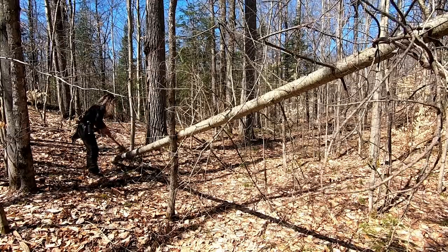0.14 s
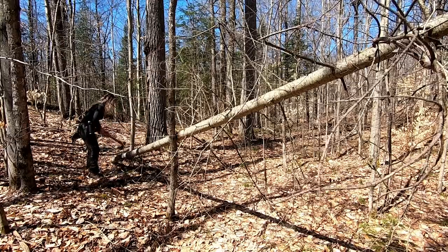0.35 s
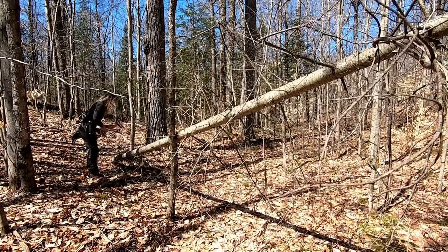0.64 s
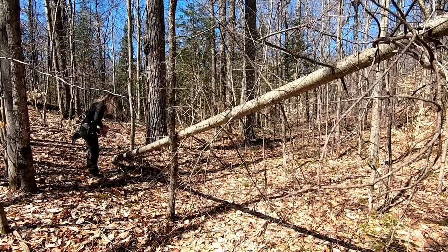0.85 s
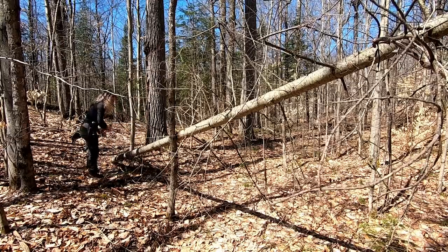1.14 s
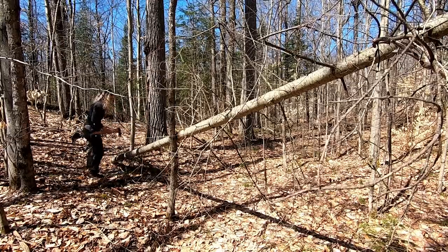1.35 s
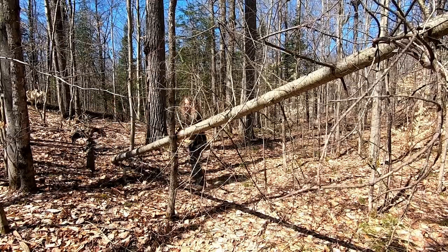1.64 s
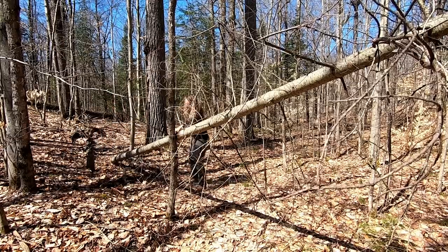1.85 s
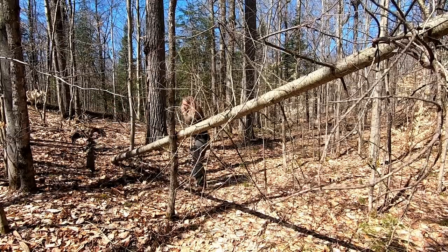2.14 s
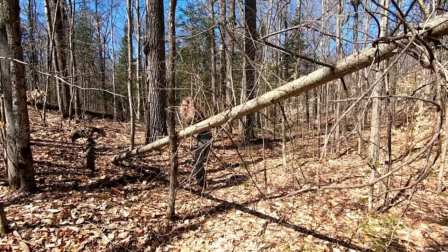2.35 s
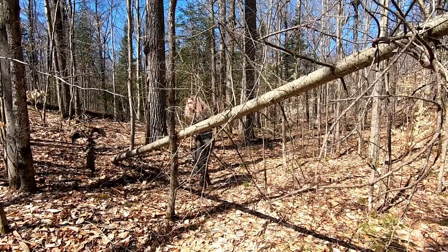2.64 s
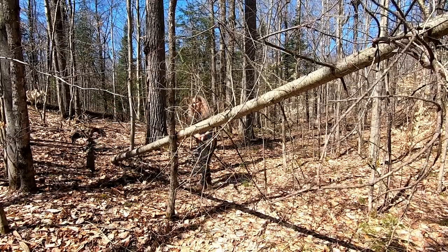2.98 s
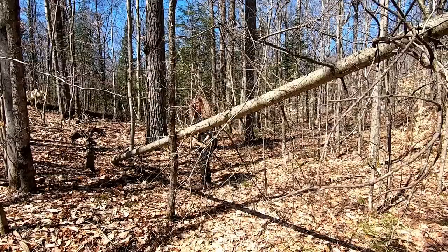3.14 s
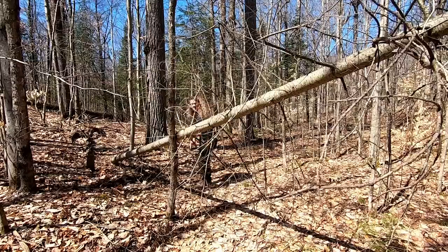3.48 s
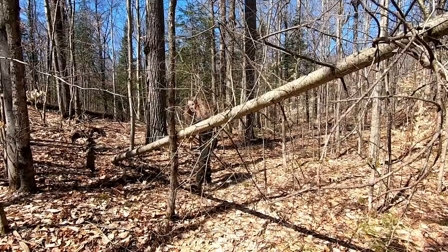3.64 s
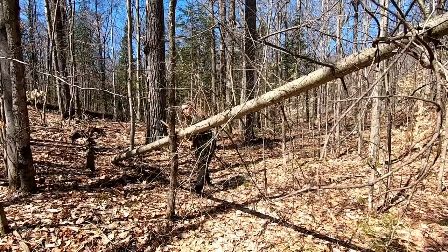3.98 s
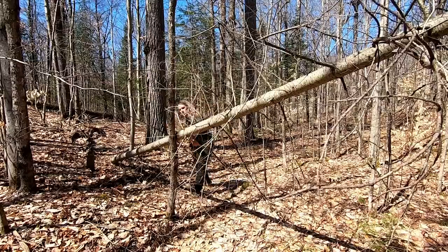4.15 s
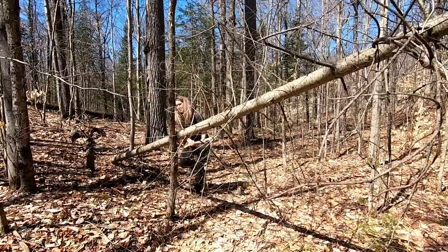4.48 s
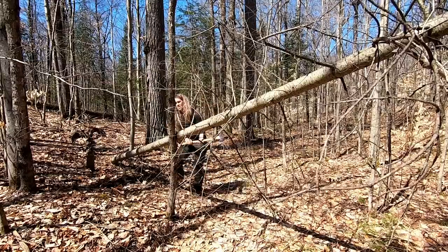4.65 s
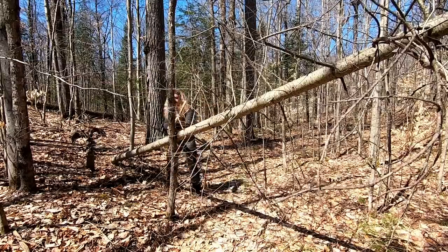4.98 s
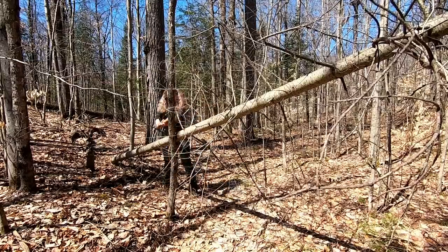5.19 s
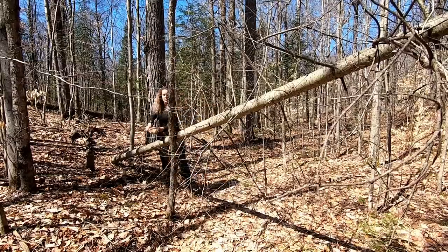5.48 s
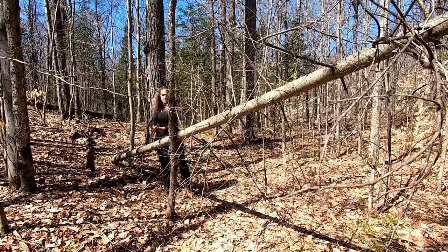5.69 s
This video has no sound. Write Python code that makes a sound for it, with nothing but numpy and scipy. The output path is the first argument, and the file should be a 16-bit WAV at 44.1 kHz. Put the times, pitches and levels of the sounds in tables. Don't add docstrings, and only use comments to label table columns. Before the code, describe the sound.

Dry dead wood is broken by hand outdoors: one hollow crack at the start, a near lull, then a piercing snap and several splintering breaks. Small twig ticks and shuffling leaf litter fill the gaps. Low wind flutter thumps the left channel of a small camera's microphone, easing later; short echoes scatter off the trunks.

```python
import sys
import numpy as np
from scipy import signal
from scipy.fft import rfft, irfft
from scipy.io import wavfile
from scipy.ndimage import uniform_filter1d

SR = 44100
rng = np.random.default_rng(int(sys.argv[2]) if len(sys.argv) > 2 else 0)


def unload_audio(sound):
    columns = np.transpose(np.atleast_2d(sound))
    steps = np.round(np.clip(columns, -1, 1) * 32767)
    wavfile.write(sys.argv[1], SR, steps.astype(np.int16))


def boost_factor(decibels):
    exponent = np.asarray(decibels, float) / 20
    return 10 ** exponent


N = 256662


def evened(x):
    return x / np.sqrt(np.mean(x ** 2) + 1e-20)


def smoothed(x, size):
    return uniform_filter1d(uniform_filter1d(x, size=size), size=size)


def read(points, hz):
    f, value = np.transpose(points)
    return np.interp(np.log(hz + 1), np.log(f + 1), value)


def sides(pan_db):
    return np.array([boost_factor(np.asarray(pan_db) / 2), boost_factor(-np.asarray(pan_db) / 2)])


def add(mix, s, sound):
    part = mix[:, max(round(s * SR), 0):][:, :sound.shape[1]]
    part += sound[:, :part.shape[1]]


def colour(x, gain):
    size = x.shape[-1]
    return irfft(rfft(x) * gain(np.fft.rfftfreq(size, 1 / SR)), size)


def resonate(x, hz, width):
    turn = np.exp(2j * np.pi * np.cumsum(hz * np.ones(x.shape[-1])) / SR)
    r = np.exp(-np.pi * width / SR)
    return 2 * (turn * signal.lfilter([1 - r], [1, -r], x / turn)).real


def ring(x, hz, width):
    return evened(resonate(resonate(x, hz, width), hz, width))


def wander(hz):
    return evened(colour(rng.standard_normal(N), lambda f: np.exp(-(f / hz) ** 2)))


def swells(rows, floor_db):
    nearer_s = 1.474
    t = np.arange(0, N + 64, 64) / SR
    levels = []
    for s, hold, peak_db, rise, fall in rows:
        before = (s - t) / max(rise, .002)
        after = (t - s - hold) / max(fall, .002)
        other_view = (t < nearer_s) != (s < nearer_s)
        levels.append(peak_db - 20 * np.maximum(0, np.maximum(before, after)) - 99 * other_view)
    return boost_factor(np.maximum(np.array(levels + [floor_db + 0 * t]), -200)) ** 2


def per_sample(slow):
    return np.interp(np.arange(N) / 64, np.arange(len(slow)), slow)


def blended(power, values):
    return per_sample(np.array(values) @ power / power.sum(axis=0))


# hz, lead_rad
PORT_LEAD = [(300, -3), (1380, 0.91), (5250, 0), (6600, 1.21), (8790, 1.5), (11000, 1.17), (15000, 0.8)]


def ports(x, bearing=0.97):
    return colour(x, lambda f: np.exp(.5j * bearing * np.outer([1, -1], read(PORT_LEAD, f))))


# hz, density_db_per_hz
SPLINTER_SPECTRUM = [(280, -35), (480, -6), (1420, -4), (2590, -2.5), (3090, -3.5), (3330, -3), (5480, -8),
                     (8900, -12), (14700, -37), (16000, -44.5)]
# hz, share_0_to_1
PORT_DIFFERENCE = [(500, 0.7), (3000, 0), (6500, 0.8), (15000, 1)]


def splinter(rows, ring_db, ring_q, lumps_db, tail_db, tail_longer, size=8192):
    out, t = np.zeros((2, N)), np.arange(size) / SR
    for s, peak_db, hz, t60, bright in rows:
        noise, lumps, bits, *own = rng.standard_normal((5, size))
        noise = noise + colour(np.array(own), lambda f: 1.27 * read(PORT_DIFFERENCE, f))

        def wood(f):
            return boost_factor(read(SPLINTER_SPECTRUM, f) + bright * np.log2(np.clip(f, 1100, 9500) / 3500))

        tear = evened(colour(noise, wood)) + boost_factor(ring_db) * ring(noise, hz, hz / ring_q)
        t60 = max(t60, .004)
        debris = evened(boost_factor(3.3 * evened(uniform_filter1d(bits, size=110))))
        fall = boost_factor(-60 * t / t60) + debris * boost_factor(tail_db - 60 * t / (tail_longer * t60))
        lumps_grow = 1 - np.exp(-t / 0.0023)
        fall *= boost_factor(lumps_db * lumps_grow * evened(uniform_filter1d(lumps, size=40)))
        onset = np.minimum(t / 0.00039, 1)
        burst = np.roll(tear * fall * onset, 64, axis=1)
        burst = ports(burst, rng.uniform(0.79, 1.5))
        add(out, s - .0013, boost_factor(peak_db - 13) * burst * sides([-1.5 + rng.normal(0, 0.89)]))
    return out


# start_s, peak_db, ring_hz, brightness_db_per_octave
LIMB_CRACKS = [(0.0833, -8, 3600, 3), (1.4759, -35, 3130, 4.5), (1.622, -26.5, 1900, -6),
               (2.1078, -27.5, 3760, 0), (2.3535, -32, 2630, 1.0), (2.722, -23, 2590, 1),
               (2.737, -19, 4560, -4), (2.7416, -10, 4570, 0.5), (2.7465, -12, 3000, 0),
               (2.7613, -25, 2687, -6), (2.9815, -26.5, 1760, 1.0), (3.273, -25, 2150, 0.5),
               (4.3205, -19, 3050, -3), (4.3245, -5.5, 3080, .5), (4.3285, -11, 3050, 0),
               (4.338, -15, 5500, 2), (4.3453, -16, 3020, 3), (4.3812, -20.5, 2090, -1),
               (4.7434, -27, 5980, 1.5), (4.7512, -16.5, 3400, -1), (4.7988, -26, 1910, 1.5),
               (4.917, -26, 4350, 2.5), (4.925, -23, 3500, 1), (4.9335, -21, 3180, 1.0),
               (4.944, -23, 4500, 1), (4.9793, -26, 3320, -1.5), (5.3832, -4, 5300, 0),
               (5.3872, -8.5, 4500, 0), (5.4775, -9, 5000, 2.0), (5.4923, -13, 4550, 2)]
# start_s, peak_db, ring_hz
BARK_SCUFFS = [
    (.0454, -36, 2400),
    (2.062, -31.5, 4700),
    (3.9977, -25, 2850),
    (4.711, -25, 7680),
    (5.1972, -23, 3680),
]
# start_s, peak_db, ring_hz, t60_s, brightness_db_per_octave
GIVING_FIBRES = [
    (.0733, -17, 1500, 0.035, -6),
    (1.9468, -21, 4400, 0.017, -4),
    (1.9541, -2.5, 5050, 0.0073, 5),
    (5.4672, -9.5, 3520, 0.024, 1),
    (5.471, -11.5, 2220, 0.035, 1),
]


def limbs():
    tears = [(s, db, hz, .031 - .0007 * db, bright) for s, db, hz, bright in LIMB_CRACKS]
    scuffs = [(*row, .093, 1.9) for row in BARK_SCUFFS]
    return splinter(tears + scuffs + list(GIVING_FIBRES), ring_db=-9.0, ring_q=5.0, lumps_db=2.8,
                    tail_db=-14, tail_longer=8.0)


# middle_s, peak_db, pitch_hz, cycles
KNOCKS_AND_PINGS = [(.69, -51, 2820, 7), (.728, -46, 3400, 9), (.867, -49, 3300, 6), (.871, -47, 3800, 9),
                    (.0705, -42, 1000, 5), (.0762, -28, 1200, 1.7), (.0799, -7.5, 1054, 2.2),
                    (.0845, -25, 1060, 3.2), (1.623, -36, 600, 0.75), (1.949, -15, 4370, 8),
                    (1.952, -7.5, 1530, 0.61), (1.9543, 2.5, 4750, 1.84), (1.9556, -4, 5700, 2.1),
                    (1.9575, -26, 5000, 6), (2.7405, -15.5, 1000, 1.8), (2.745, -19.5, 1300, 5.9),
                    (2.719, -36, 1250, 6), (2.7378, -26, 4500, 9), (2.7435, -20, 4500, 12),
                    (2.749, -22, 846, 2.7), (2.757, -29, 610, 4.1), (4.3135, -43, 800, 4),
                    (4.3237, -12, 845, 2.7), (4.3265, -14, 3100, 5), (4.3295, -14, 3050, 7),
                    (4.3465, -22, 3100, 9), (4.3605, -27, 2900, 10), (4.303, -40, 3900, 8),
                    (2.7615, -27, 2750, 9), (5.3842, -15, 2700, 4), (5.4175, -31, 2200, 9),
                    (4.328, -18.5, 1295, 5.8), (4.388, -36, 610, 6.5), (4.755, -32, 1330, 1.8),
                    (4.958, -24.5, 870, 1.76), (5.308, -27.5, 830, 1.3), (5.372, -43, 900, 3),
                    (5.377, -24, 1300, 2.5), (5.3783, -27, 2900, 4), (5.38, -29, 1000, 1.5),
                    (5.3828, -13.5, 940, 2.2), (5.3855, -20, 1230, 2.7), (5.471, -25, 1700, 3.5)]


def knocks():
    out, t = np.zeros((2, N)), np.arange(-441, 441) / SR
    for s, peak_db, hz, cycles in KNOCKS_AND_PINGS:
        pan_db = -4.5 if hz < 1400 else -1.5
        swing = np.exp(-(2.03 * t * hz / cycles) ** 2) * np.sin(2 * np.pi * hz * t + 1.24)
        add(out, s - 441 / SR, boost_factor(peak_db) * swing * sides([pan_db]))
    return ports(out)


def thinness_db(hz):
    return 4.2 * np.log2(hz / 2200)


# start_s, peak_db, ring_hz, t60_s
TWIG_TICKS = [(0.2067, -26, 3500, 0.026), (0.224, -14.5, 3480, 0.022), (0.2753, -30, 2420, 0.034),
              (0.388, -38, 3660, 0.026), (0.437, -35, 2050, 0.022), (0.5067, -31, 3300, 0.04),
              (0.7245, -36, 3270, 0.027), (0.7554, -39.5, 3430, 0.047), (0.941, -41.5, 4230, 0.027),
              (1.203, -18.5, 5000, 0.01), (1.494, -22.5, 8200, 0.066), (1.708, -26, 3060, 0.022),
              (2.4224, -29, 6330, 0.015), (2.5583, -27, 3260, 0.022), (2.8794, -29.5, 1710, 0.018),
              (2.9158, -31, 2800, 0.022), (2.9502, -31, 2990, 0.027), (3.374, -33, 4070, 0.018),
              (4.0302, -23, 3930, 0.04), (4.2372, -25.5, 3880, 0.023), (4.3868, -9, 4500, 0.013),
              (4.904, -31, 7500, 0.04), (4.956, -14, 3220, 0.025), (5.1507, -27.5, 1930, 0.036),
              (5.3082, -12.5, 3700, 0.013), (5.5241, -25, 3000, .03), (5.5897, -30, 2640, 0.025)]


def twigs():
    rows = [(*row, min(thinness_db(row[2]), 4.5)) for row in TWIG_TICKS]
    return splinter(rows, ring_db=-7.5, ring_q=6.5, lumps_db=5.0, tail_db=-13.0, tail_longer=5.0, size=4096)


# start_s, peak_db, pitch_hz, t60_s
TRUNK_SHUDDERS = [(0.084, -34, 170, 0.23), (.084, -35, 330, 0.09), (1.62, -45, 350, 0.087),
                  (1.954, -33.5, 260, .08), (2.743, -32, 520, 0.077), (4.325, -32, 130, .3),
                  (4.326, -27.5, 250, .2), (4.386, -41, 230, 0.12), (4.956, -38, 330, 0.082),
                  (5.383, -29, 320, .12), (5.469, -36, 220, 0.2), (1.48, -53, 400, .2),
                  (4.03, -53, 350, .5), (5.2, -42, 260, .08), (5.307, -42, 300, .06)]


def shudders():
    out, t = np.zeros((2, N)), np.arange(SR // 2) / SR
    for s, peak_db, hz, t60 in TRUNK_SHUDDERS:
        rumble = ring(rng.standard_normal(len(t)), hz, 1.1 * hz)
        add(out, s, boost_factor(peak_db - 60 * t / t60) * np.minimum(t / 0.0025, 1) * rumble * sides([-1.5]))
    return out


# start_s, peak_db, pitch_hz, width_hz, t60_s
TWIG_WHIPS = [
    (1.96, -53, 8300, 70, 0.9),
]


def whips():
    out, t = np.zeros((2, N)), np.arange(SR // 2) / SR
    caught_s = .125
    for s, peak_db, hz, width, t60 in TWIG_WHIPS:
        whistle = ring(rng.standard_normal(len(t)), hz, width)
        gate = np.clip(np.minimum(t / .008, (caught_s - t) / .03), 0, 1)
        add(out, s, boost_factor(peak_db - 60 * t / t60) * gate * whistle * sides([-1.5]))
    return out


# hz, density_db_per_hz
LEAF_SPECTRUM = [(150, -23.5), (250, 0.5), (282, -16), (651, -28), (802, -15), (1350, -15), (2570, -10.5),
                 (2960, -8), (9010, -11.5), (13400, -29.5), (16000, -48.5)]
# peak_s, level_db, rise_s, fall_s, brightness_db_per_octave
LEAF_SHUFFLES = [(.1, -43, .07, .5, -1.5), (.2, -41.5, .25, .17, -2.5), (.275, -47, .3, .07, -3.5),
                 (.42, -53.5, .8, .45, -3), (.75, -61, .8, .8, -1), (1.15, -60.5, 1.2, .55, -1.5),
                 (1.49, -47, .3, .4, -2), (1.66, -40.5, .3, .42, .3), (1.99, -49, .12, .5, 0),
                 (2.2, -43.5, .5, .33, -.3), (2.5, -55, .6, .6, -1), (2.7, -45.5, .3, .2, -.5),
                 (2.9, -49, .5, .4, -2.5), (3.13, -52, .6, .6, -2), (3.38, -50, .4, .62, -1.5),
                 (4.01, -48, .12, .3, -1.5), (4.085, -47, .25, .14, -2.5), (3.3, -49.5, .08, .3, -2.5),
                 (3.88, -60, .5, .3, -1), (4.25, -49.5, .5, .5, -2), (4.35, -41.5, .06, .24, 0),
                 (4.58, -52, .5, .4, -2.5), (4.74, -45.5, .06, .3, -2.5), (4.93, -43.5, .3, .25, 1.5),
                 (5.22, -45, .6, .8, -1.5), (5.42, -44.5, .1, .4, 1), (5.62, -45.5, .4, .6, -1)]
# time_s, share_0_to_1
GROUND_BOUNCE = [
    (0, .05),
    (1.47, .05),
    (1.48, .24),
    (2.3, .2),
    (2.7, .08),
    (5.82, .1),
]


def litter(grains_per_s=900, spread_db=2.9, hiss_db=-1.0, clump_db=0.9, patchy_db=1.5):
    power = swells([(s, 0, *shape) for s, *shape, _ in LEAF_SHUFFLES], -72)
    level_db = per_sample(10 * np.log10(power.sum(axis=0)))
    bright = blended(power, [row[-1] for row in LEAF_SHUFFLES] + [-1.5])

    size = boost_factor(spread_db * np.minimum(rng.exponential(1, N), 5)) * (rng.random(N) < grains_per_s / SR)
    bursts = evened(signal.lfilter([1], [1, -np.exp(-1 / (0.0018 * SR))], size))
    hiss = boost_factor(hiss_db + .3 * (level_db + 50))
    drive = np.hypot(bursts, hiss) * boost_factor(clump_db * wander(25)) * rng.standard_normal((3, N))

    hz, t, z = signal.stft(drive, SR, nperseg=256)
    share = np.clip(read(PORT_DIFFERENCE, hz), 0, 1)[:, None]
    z = np.sqrt(1 - share ** 2) * z[0] + share * z[1:]
    z = z * boost_factor(read(LEAF_SPECTRUM, hz))[:, None]
    patches = uniform_filter1d(rng.standard_normal(z.shape[1:]), size=5, axis=0)
    patches = uniform_filter1d(patches, size=4, axis=1)
    z *= boost_factor(patchy_db * evened(patches))
    octaves = np.log2(np.clip(hz[:, None], 300, 9500) / 3500)
    tilt_db = octaves * np.interp(t, np.arange(N) / SR, bright)
    even = np.sqrt(np.mean(signal.istft(z, SR, nperseg=256)[1] ** 2))
    leaves = signal.istft(z * boost_factor(tilt_db), SR, nperseg=256)[1][:, :N] / even

    delay_s = .00104 + .00004 * wander(3)
    late = np.arange(N) - SR * delay_s
    bounce = np.array([np.interp(late.round(), np.arange(N), side) for side in leaves])
    leaves = leaves + np.interp(np.arange(N) / SR, *np.transpose(GROUND_BOUNCE)) * bounce
    return ports(leaves) * boost_factor(level_db + .5) * sides([-1.5])


# start_s, peak_db, ring_hz
LEAF_STALKS = [(0.0154, -42, 3560), (0.5999, -45, 3520), (0.6553, -46, 3340), (0.7915, -44, 1810),
               (0.9821, -46, 2030), (1.027, -44, 4780), (1.0888, -39, 4580), (1.1751, -40, 2340),
               (1.7745, -29, 2980), (1.8302, -36, 3380), (1.8893, -41, 2900), (2.0714, -30, 3790),
               (2.1174, -35, 3150), (2.5353, -32, 3170), (2.6061, -38, 2910), (2.7967, -27, 2770),
               (2.8494, -37, 3570), (2.9654, -30, 2920), (3.1175, -39, 3920), (3.1712, -41, 2810),
               (3.2257, -35, 2750), (3.5325, -41, 1540), (3.6563, -45, 3930), (3.8892, -40, 5820),
               (4.1387, -41, 3970), (4.1546, -35, 4900), (4.5128, -36, 3070), (4.5742, -38, 5520),
               (4.6026, -35, 5750), (4.6773, -41, 4760), (4.7744, -32, 4150), (5.0024, -32, 3730),
               (5.1337, -33, 3640), (5.2526, -34, 2890), (5.2801, -33, 3630), (5.7859, -37, 3740)]


def stalks():
    rows = [(s, min(db + 1.5, -32), hz, .03, .4 * thinness_db(hz)) for s, db, hz in LEAF_STALKS]
    return splinter(rows, ring_db=-9.0, ring_q=4.0, lumps_db=3.0, tail_db=-16.0, tail_longer=2.5, size=2048)


def facing(pan_db):
    return sides(pan_db) / np.sqrt((sides(pan_db) ** 2).mean(0))


def steady(x):
    return x / np.sqrt(smoothed(x ** 2, 4000) + 1e-20)


def eddies(noise, low_hz, rise, bend, high_hz, cut):
    low = lambda f: (f / low_hz) ** rise / (1 + (f / low_hz) ** bend)
    return colour(noise, lambda f: low(f) / (1 + (f / high_hz) ** cut))


# start_s, hold_s, level_db, side_on_to_left_port_0_to_1
WIND_GUSTS = [(0, .05, -46, .1), (.075, .06, -39, .4), (.17, .16, -48, .12), (.56, .08, -66, .02),
              (1.49, .1, -45, .25), (1.61, .12, -34, .25), (1.76, .24, -34.5, .14), (2.03, .35, -31.5, .85),
              (2.41, .17, -28, 1.05), (2.61, .15, -31.5, .9), (2.79, .1, -43, .2), (2.93, .21, -51, .15),
              (3.18, .17, -37.5, .45), (3.38, .2, -30, 1.05), (3.61, .11, -31.5, .6), (3.77, .07, -45, .03),
              (3.89, .18, -52, .02), (4.11, .07, -46, .01), (4.33, .08, -40, .4), (4.45, .12, -56, .15),
              (4.62, .12, -45, .02), (4.84, .14, -43, .4), (5.03, .07, -40, .05), (5.18, .08, -43, .15),
              (5.32, .22, -52, .4), (5.6, .24, -37, .18)]


def wind(lumps_db=4.5, shared=0.24):
    power = swells([(*row[:3], .04, .06) for row in WIND_GUSTS], -75)
    level_db = per_sample(10 * np.log10(power.sum(axis=0)))
    side_on = blended(power, [row[-1] for row in WIND_GUSTS] + [.3])
    quick_db = -22 + 19.5 * np.sqrt(np.clip(side_on, 0, 2))
    pan_db = -6 + 21 * side_on + 4 * wander(7)

    a, b = rng.standard_normal((2, 2, N))
    noise = np.array([a, shared * a + np.sqrt(1 - shared ** 2) * b])
    heave = eddies(noise[:, 0], 42, 1.17, 1.97, 105, 5.66)
    roll = eddies(noise[:, 0], 38, 1.2, 2.2, 62, 5.5)
    strong = np.clip((level_db + 54) / 8, 0, 1)
    heave = strong * evened(heave) + (1 - strong) * evened(roll)
    flutter = eddies(noise[:, 1], 125, 3.55, 5.98, 350, 4.5)
    quick = np.minimum(boost_factor(quick_db), .97) * np.clip((level_db + 58) / 8, 0, 1)

    slow_part = np.sqrt(1 - quick ** 2) * steady(heave) * facing(.4 * pan_db)
    flicker = evened(boost_factor(2.5 * np.array([wander(29), wander(22)])))
    quick_part = quick * facing(pan_db) * steady(flutter) * flicker
    lumps = np.array([wander(30) - wander(26), wander(30) - wander(35)]) / 2
    return (slow_part + quick_part) * evened(boost_factor(lumps_db * lumps)) * boost_factor(level_db - .7)


# middle_s, peak_db, pitch_hz, push_or_pull_sign
LEFT_SLAPS = [(2.075, -21, 113, 1), (2.14, -16, 90, -1), (2.205, -22.5, 153, 1), (2.405, -19, 103, -1),
              (2.458, -21, 101, 1), (2.491, -11, 104, 1), (2.529, -15.5, 124, -1), (2.575, -19, 182, 1),
              (2.634, -24, 96, -1), (2.666, -22, 159, 1), (2.728, -19, 88, -1), (3.173, -27, 76, -1),
              (3.235, -26, 65, -1), (3.299, -25, 50, 1), (3.373, -24, 117, 1), (3.41, -17.5, 139, -1),
              (3.443, -17.5, 142, -1), (3.479, -15, 168, -1), (3.532, -14, 154, 1), (3.575, -21, 138, -1),
              (3.677, -16, 90, 1), (3.764, -29, 57, 1), (5.663, -27, 42, 1), (5.803, -23, 58, 1)]
# middle_s, peak_db, pitch_hz, push_or_pull_sign
RIGHT_SLAPS = [(.117, -29, 70, 1), (.305, -37, 60, 1), (1.623, -25, 73, -1), (1.759, -24, 69, -1),
               (1.809, -28, 53, -1), (1.888, -29, 43, 1), (2.042, -26, 80, -1), (2.222, -21, 54, -1),
               (2.378, -29, 85, -1), (2.519, -25, 51, -1), (2.552, -23, 56, -1), (3.279, -27, 74, -1),
               (3.381, -27, 65, -1), (3.523, -28, 50, 1), (3.604, -20, 74, -1), (3.668, -24, 45, -1),
               (3.813, -34, 53, -1), (4.28, -36, 60, 1), (4.951, -31, 75, 1), (5.043, -26, 74, -1),
               (5.081, -23, 65, -1), (5.214, -29, 94, 1), (5.616, -27, 74, 1), (5.698, -20, 65, -1),
               (5.762, -26, 65, -1)]


def slaps():
    out, t = np.zeros((2, N)), np.arange(-1500, 1500) / SR
    for rows, left_db, right_db in [(LEFT_SLAPS, -1.5, -22), (RIGHT_SLAPS, -11, -2.5)]:
        for s, peak_db, hz, sign in rows:
            swing = np.exp(-(1.4 * hz * t) ** 2) * np.cos(2 * np.pi * hz * t)
            add(out, s - 1500 / SR, sign * boost_factor(peak_db) * swing * boost_factor(np.array([[left_db], [right_db]])))
    return out


# hz, t60_s
WOODS_DECAY = [(200, 0.23), (2000, 0.23), (8000, 0.15), (16000, 0.036)]


def woods(x):
    taps = np.zeros((2, SR // 2))
    at = np.arange(60, SR // 2 - 20, 20) + rng.integers(0, 20, (2, (SR // 2 - 61) // 20))
    np.put_along_axis(taps, at, rng.choice([-1., 1.], at.shape), 1)
    hz, t, z = signal.stft(taps, SR, nperseg=128)
    decay = boost_factor(-60 * t / read(WOODS_DECAY, hz)[:, None])
    tail = signal.istft(z * decay, SR, nperseg=128)[1]
    return signal.fftconvolve(x, tail / np.linalg.norm(tail[0]), axes=1)[:, :N]


# hz, density_db_per_hz
AIR_SPECTRUM = [(24, -14), (40, -5), (100, -30), (145, 2), (305, -6), (585, -18.5), (751, -11),
                (1040, -18.5), (3380, -23.5), (5310, -19), (9690, -31), (11300, -36), (13800, -45),
                (16000, -61.5)]


def air():
    hush = colour(rng.standard_normal((2, N)), lambda f: boost_factor(read(AIR_SPECTRUM, f)))
    return boost_factor(-62.5) * evened(hush)


def scene():
    wood = limbs() + knocks() + twigs() + shudders() + whips()
    leaves = litter()
    echoes = boost_factor(-24) * woods(wood) + boost_factor(-11) * woods(leaves)
    return wood + leaves + stalks() + wind() + slaps() + echoes + air()


def top_cut(x):
    return signal.sosfilt(signal.butter(12, 16830, fs=SR, output="sos"), x)


def record(dry):
    band = signal.oaconvolve(dry, signal.firwin(255, 15700, fs=SR)[None], "same")
    mix = np.clip(band, -1, 1)
    return top_cut(mix)


dry = scene()
out = record(dry)
unload_audio(out)
```